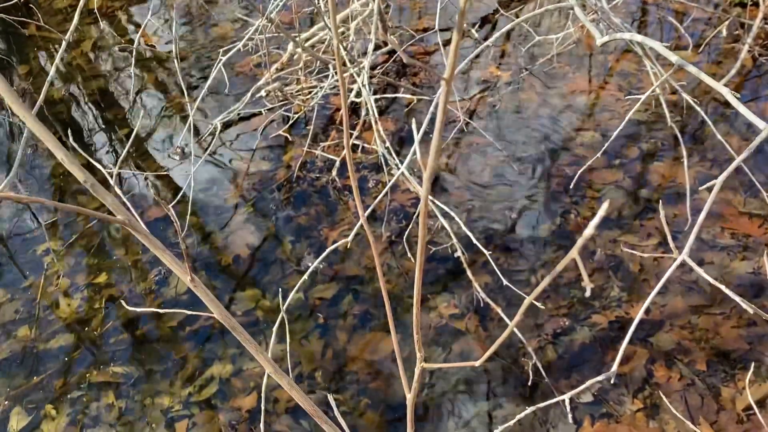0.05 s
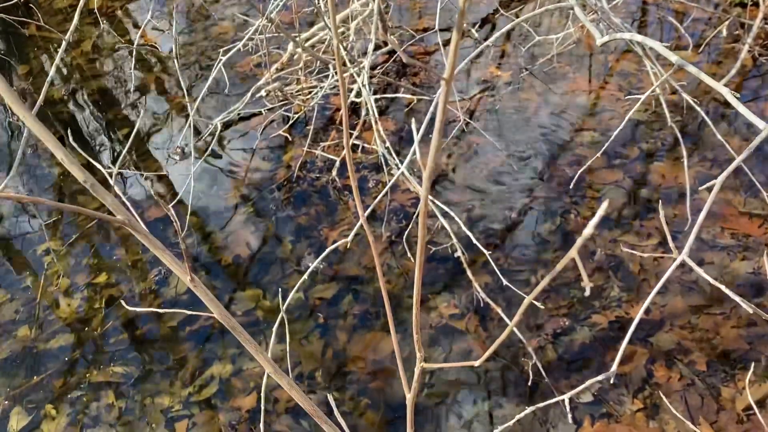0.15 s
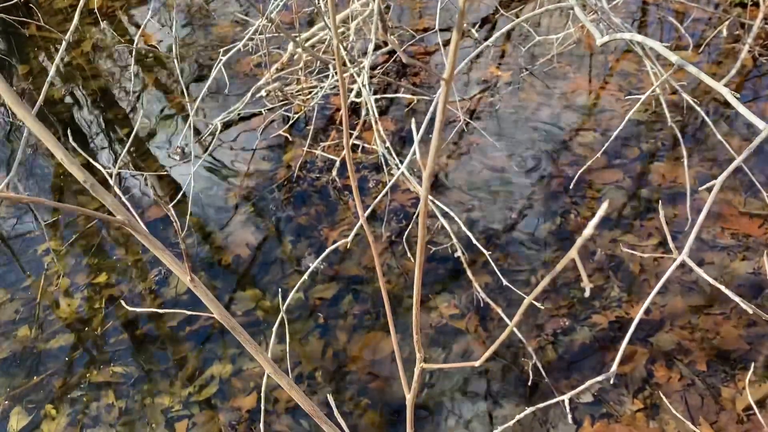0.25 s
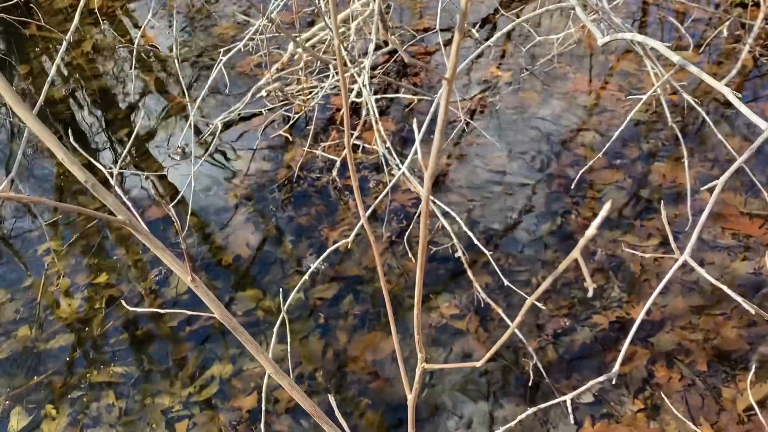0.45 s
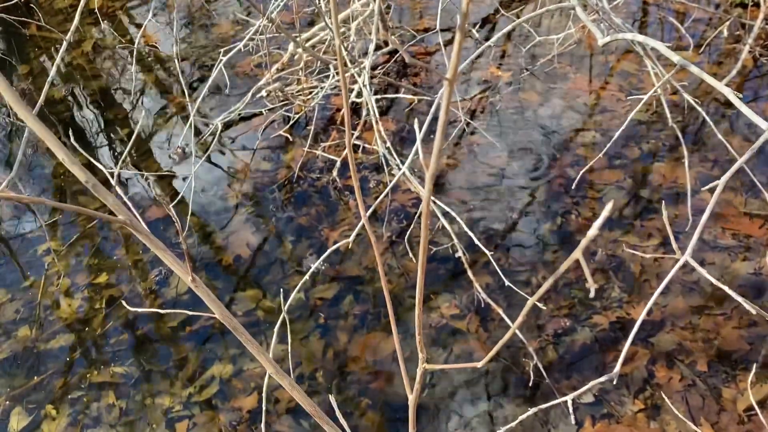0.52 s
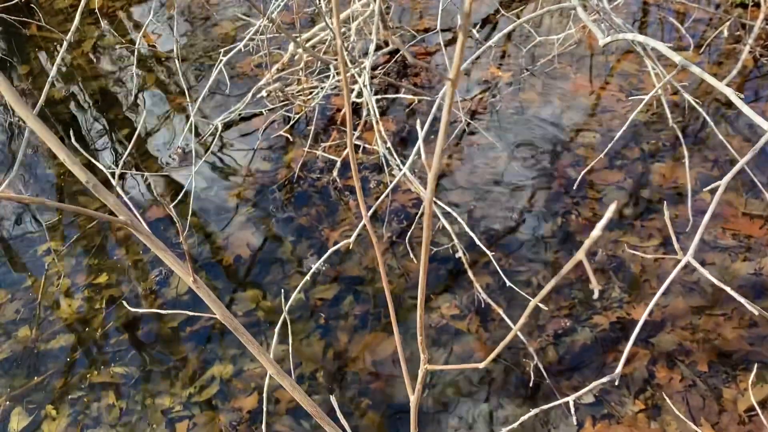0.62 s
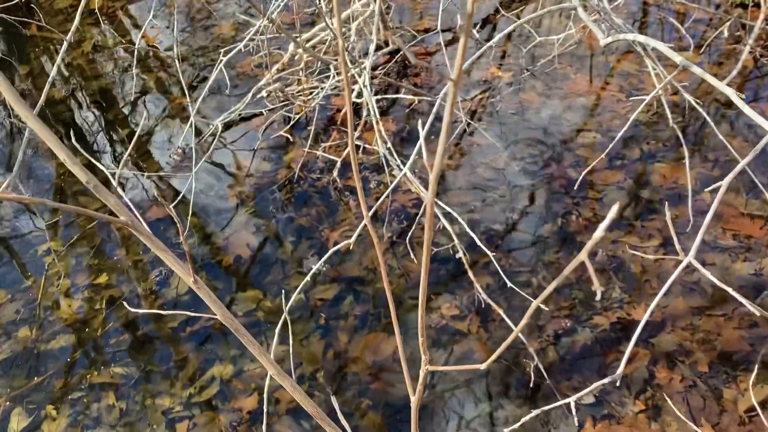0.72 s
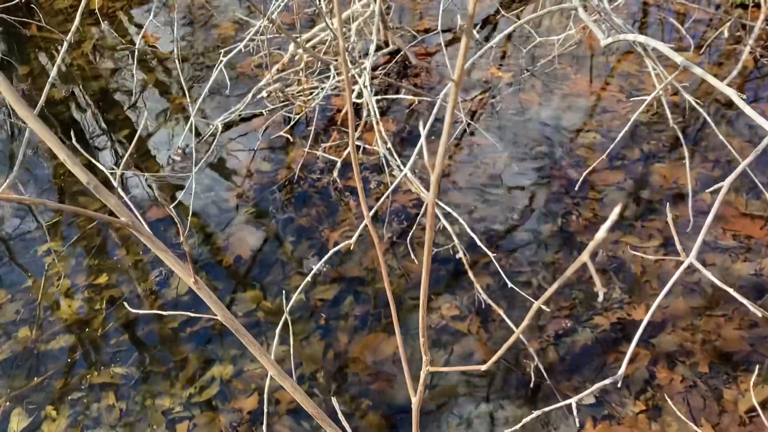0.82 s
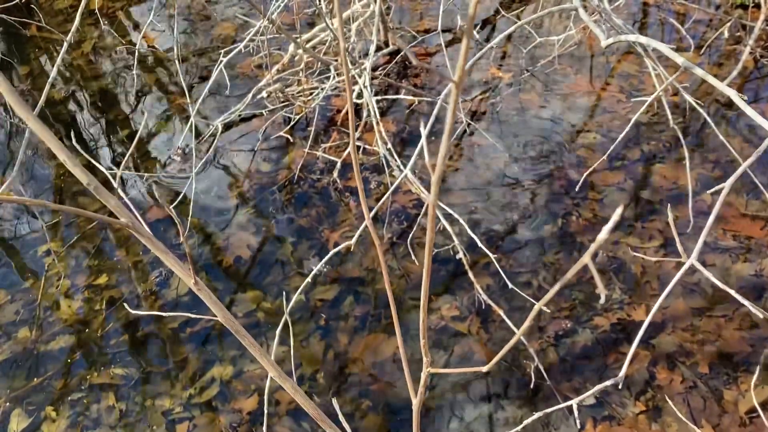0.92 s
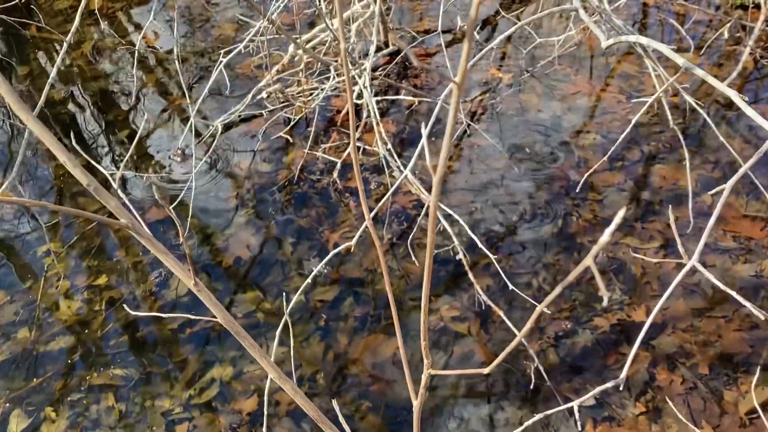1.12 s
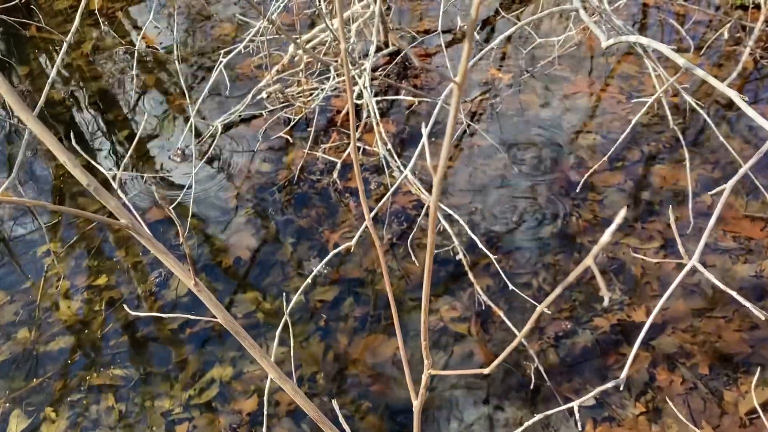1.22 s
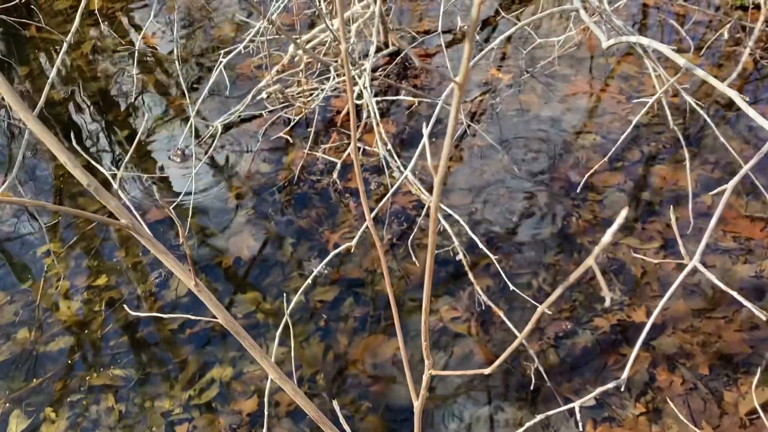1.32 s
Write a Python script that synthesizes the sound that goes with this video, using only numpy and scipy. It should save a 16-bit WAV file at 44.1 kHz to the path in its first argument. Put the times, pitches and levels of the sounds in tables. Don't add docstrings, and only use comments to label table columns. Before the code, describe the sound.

Overlapping short raspy frog croaks from a woodland pool, thickest mid-way, over very quiet low background

```python
import sys
import numpy as np
from scipy import signal
from scipy.fft import rfft, irfft, next_fast_len
from scipy.io import wavfile
from scipy.ndimage import map_coordinates

SR = 44100
rng = np.random.default_rng(int(sys.argv[2]) if len(sys.argv) > 2 else 0)


def materialize(psi):
    bounded = np.clip(np.atleast_2d(psi).T, -1, 1)
    quanta = np.round(bounded * 32767).astype(np.int16)
    wavfile.write(sys.argv[1], SR, quanta)


def to_linear_factor(level_db):
    exponent = np.asarray(level_db, float) / 20
    return 10 ** exponent


N = 59535


def along(points, hz):
    f, v = np.transpose(points)
    return np.interp(np.log(hz + 1), np.log(f + 1), v)


def unit(x):
    return x / np.sqrt(np.mean(x ** 2) + 1e-20)


def filtered(x, response):
    m = next_fast_len(x.shape[-1] + 8192)
    spectrum = rfft(x, m) * response(np.fft.rfftfreq(m, 1 / SR))
    return irfft(spectrum, m)[..., :x.shape[-1]]


def wobble(rate):
    knots = rng.standard_normal(int(N * 60 / SR) + 4)
    return map_coordinates(knots, [np.arange(N) * rate / SR], mode="nearest")


def noise(spectrum, alike):
    a, b = filtered(rng.standard_normal((2, N)), lambda hz: to_linear_factor(along(spectrum, hz)))
    angle = np.arccos(np.clip(alike, -1, 1)) / 2
    mid, side = np.cos(angle) * a, np.sin(angle) * b
    return unit(np.array([mid + side, mid - side]))


# pitch_hz, level_db (per Hz)
CHORUS_COLOUR = [(200, -41.5), (364, -25), (700, 1.5), (1600, -0.5), (2600, -11), (4000, -23.5),
                 (6000, -36), (12000, -44)]
# time_s, level_db
CHORUS_LEVEL = [
    (0, -58),
    (.16, -57),
    (.3, -54),
    (.8, -53),
    (.95, -55),
    (1.04, -54),
    (1.35, -53),
]


def distant_chorus():
    time_s, level_db = np.transpose(CHORUS_LEVEL)
    swell_db = np.interp(np.arange(N) / SR, time_s, level_db)
    flutter_db = 1.2 * wobble(25) + 1.2 * wobble(55)
    return to_linear_factor(swell_db + flutter_db) * noise(CHORUS_COLOUR, .4)


# pitch_hz, level_db (per Hz)
RUMBLE_COLOUR = [(20, -35), (32, -18), (44, -2), (75, 1), (125, -10), (161, -18), (298, -28), (420, -50)]


def traffic_rumble():
    return to_linear_factor(-63 + 2.9 * wobble(9)) * noise(RUMBLE_COLOUR, 0.89)


def hum():
    return to_linear_factor(-71 + 2.1 * wobble(5)) * np.sin(2 * np.pi * 117.5 * np.arange(N) / SR)


# last_tick_s, peak_db, gap_ms, swell_db_per_ms, squeak_db
SWELLS = [(.7537, -23, 4.2, .9, -40), (.6258, -31, 3.7, .5, -45), (.9264, -25, 6.9, .6, -35),
          (.8623, -30, 5.9, 2.5, -57), (.3917, -27, 5.2, 1.5, -40), (.4562, -28, 10, 1.3, -48),
          (.328, -28, 6.1, .5, -52), (.5599, -22, 3.8, .55, -55), (.6846, -24, 3.7, .8, -51),
          (.8564, -29, 3.3, .8, -66), (.899, -30, 3.9, .4, -66), (.1825, -29, 4.8, .4, -66),
          (.153, -39, 6, .6, -66), (.127, -46, 4, .5, -62)]
SWELL_CALLER = [0, 9, 1, 1, 3, 4, 5, 6, 6, 6, 6, 8, 8, 3]

PULSE = np.arange(14)


def swells_of(caller):
    return [row for row, who in zip(SWELLS, SWELL_CALLER) if who == caller]


def swelling_ticks(caller):
    longest_ms, squeak_swell = 28, .55
    rows = [np.zeros((0, 4))]
    for last_s, peak_db, gap, swell, squeak_db in swells_of(caller):
        ms = gap * PULSE[gap * PULSE < longest_ms]
        rows.append(np.c_[last_s - ms / 1000, peak_db - swell * ms, squeak_db - squeak_swell * ms, 0 * ms])
    return np.vstack(rows)


# start_s, peak_db, gap_ms, hold_ms, fade_db_per_ms
CROAKS = [(.7585, -14.5, 2.5, 7.5, 1.5), (.632, -17, 2.35, 13.3, 1.3), (.933, -15.5, 2.4, 7, 1.3),
          (.9524, -26, 3, 3, 3), (.7804, -15.5, 2.35, 9.4, 1.03), (.9603, -20, 3, 10.4, 1.14),
          (.3973, -23, 2.37, 14, 1), (.4671, -19.5, 2.6, 19, 1), (.2325, -25.5, 2.6, 1.9, 1.1),
          (.2496, -22.5, 2.8, 6, .9), (.2644, -30.5, 2.3, 18.4, 1.5), (.6898, -24, 4.2, 1, .4),
          (.3123, -36, 3, 8, 2.6), (1.2925, -32, 2.34, 6.8, 1), (1.034, -44, 3.4, 19, 0.16),
          (1.109, -42, 3.3, 24, 2), (1.341, -40.5, 3.6, 9, 1.1), (.726, -37, 3.7, 9.6, 1.5),
          (1.2623, -29, 3.2, 14, 1), (.117, -41.5, 3, 12, 0), (1.2513, -39, 3.6, 8, 5),
          (1.08, -43.5, 5.4, 10, 2), (.2, -40.5, 4, 8, .5), (1.181, -40, 2.7, 12, 1),
          (.5637, -24.5, 5.3, 5.5, 4), (.2423, -25, 3.2, 3.3, 6)]
CROAK_CALLER = [0, 9, 1, 1, 2, 1, 3, 4, 5, 5, 10, 6, 3, 7, 7, 7, 7, 10, 8, 8, 8, 8, 8, 8, 6, 5]
FIRST_GAP_MS = [3.8, 4.8, 3.9, 3, 3.6, 4, 3.4, 5.5, 2.6, 2.8, 2.3, 3.9, 2.5, 2.3, 4, 4, 4, 2.5, 4.1, 4, 4,
                6, 5, 3.5, 5.3, 3.2]


def croak_bursts(caller):
    carry = .4
    squeak_fade, squeak_under_db = .75, -29
    rows = [np.zeros((0, 4))]
    for (start, peak_db, gap, hold, fade), who, first in zip(CROAKS, CROAK_CALLER, FIRST_GAP_MS):
        if who != caller:
            continue
        ms = gap * PULSE + (first - gap) * (1 - carry ** PULSE) / (1 - carry)
        lead = [swell[4] for swell in swells_of(caller) if 0 < start - swell[0] < .015]
        squeak_db = lead[0] if lead else peak_db + squeak_under_db
        sac_db = peak_db - abs(fade) * np.maximum(ms - hold, 0)
        rows.append(np.c_[start + ms / 1000, sac_db, squeak_db - squeak_fade * ms, ms / 1000])
    return np.vstack(rows)


# times_sac_pitch, level_db, t60_s
SIDE_MODES = [
    (.72, -9.5, .0063),
    (1.17, -10, .0068),
    (1.4, -22, .006),
]


def frog(rows, sac_hz, squeak_hz, sac_t60, rasp, air, deep_db, upper_hz, upper_db, rasp_db, over_db):
    jitter_s, scatter_db, detune = .0001, 1.2, .012
    strike_s, snap_s = .00033, .0002
    low_t60, squeak_t60, rasp_t60, air_t60 = .013, .01, .016, .013
    s, db, squeak_db, age = rows.T[:, :, None]
    z = rng.standard_normal((len(rows), 16, 1))
    s = s + jitter_s * z[:, 0] - strike_s
    at = np.floor(s * SR).astype(int) + 1 + np.arange(900)
    t = at / SR - s

    def ring(hz, level_db, t60, j):
        level = to_linear_factor(level_db + scatter_db * z[:, j] - 60 * t / t60)
        return level * np.sin(2 * np.pi * hz * (1 + detune * z[:, j + 7]) * t)

    sag = 1 - 2.83 * age
    low_db = db - 11 + 300 * np.minimum(age, .017)
    body = ring(sac_hz * sag, db, sac_t60, 1) - ring(830, low_db, low_t60, 2)
    body = body + ring(620, db + deep_db, low_t60, 0)
    body = body + ring(upper_hz * sag, db + upper_db, sac_t60, 7)
    for j, (ratio, level_db, t60) in enumerate(SIDE_MODES):
        body = body + ring(ratio * sac_hz * sag, db + level_db, t60, 4 + j)
    squeak = ring(squeak_hz, squeak_db, squeak_t60, 3)
    squeak = squeak + ring(10800, squeak_db - 19 + over_db, squeak_t60, 8)

    at = np.clip(at, 0, N)
    body = body + to_linear_factor(db - 20.5 + rasp_db - 60 * t / rasp_t60) * rasp[at % N]
    squeak = squeak + to_linear_factor(squeak_db - 10.5 - 60 * t / air_t60) * air[at % N]
    x = body * (1 - np.exp(-(t / strike_s) ** 2)) + squeak * (1 - np.exp(-(t / snap_s) ** 2))
    return np.bincount(at.ravel(), x.ravel(), N + 1)[:N]


# pitch_hz, t60_s
TREE_DECAY = [(500, 0.067), (2000, .11), (8000, 0.069)]


def trees(x):
    hz, t, z = signal.stft(rng.standard_normal((2, SR // 4)), SR, nperseg=128)
    tail = signal.istft(z * to_linear_factor(-60 * t / along(TREE_DECAY, hz)[:, None]), SR, nperseg=128)[1]
    late = np.pad(x, (60, 0))[None]
    return signal.fftconvolve(late, tail / np.linalg.norm(tail[0]), axes=1)[:, :N]


# sac_hz, squeak_hz, sac_t60_s, left_lag_ms, echo_db
CALLERS = [(1880, 5500, .0115, .03, -10), (1570, 7100, .009, .05, -11), (1900, 5300, .0105, -.08, -10),
           (1720, 4970, .011, -.15, -10), (1850, 5270, .011, -.15, -10), (1470, 5200, .011, -.12, -9),
           (1680, 5050, .01, -.12, -11), (1710, 5600, .018, -.39, -7), (1350, 5600, .009, -.31, -7),
           (1830, 5400, .0115, .03, -10), (1980, 5000, .009, -.12, -9)]
# deep_tone_db, upper_mode_hz, upper_db, rasp_db, overtone_db
VOICES = [(-25, 2500, -22, -3, -14), (-30, 2870, -24, 0, 8), (-18, 2450, -22, -3, -14),
          (-20, 2430, -12, 9, -14), (-20, 3250, -18, 5, -8), (-8, 3350, -20, 6, -8),
          (-12, 3150, -11, 3, -6), (-25, 2600, -15, 3, 0), (-12, 3300, -20, 5, 0), (-30, 2900, -20, -4, 12),
          (-2, 3450, -14, 8, -6)]
# pitch_hz, level_db (per Hz)
RASP_COLOUR = [(400, -31), (800, -8.5), (1700, -1.5), (3000, -19), (4200, -26), (5500, -27), (8800, -61.5),
               (11000, -53)]
# pitch_hz, level_db (per Hz)
AIR_COLOUR = [(2500, -10), (3600, 0), (5500, 0), (6300, -20), (9000, -40), (10500, -26), (12500, -28),
              (15000, -38)]


def pool():
    out = np.zeros((2, N))
    side = np.array([[.5], [-.5]])
    for caller, (sac_hz, squeak_hz, sac_t60, lag, echo_db) in enumerate(CALLERS):
        rows = np.vstack([swelling_ticks(caller), croak_bursts(caller)])
        rasp, air = noise(RASP_COLOUR, 0.92)[0], noise(AIR_COLOUR, 0.95)[0]
        x = frog(rows, sac_hz, squeak_hz, sac_t60, rasp, air, *VOICES[caller])
        out += filtered(x, lambda hz: to_linear_factor(1 * side) * np.exp(-2j * np.pi * hz * lag / 1000 * side))
        out += to_linear_factor(echo_db) * trees(x)

    def high_pass(hz):
        s = 1j * hz / 612
        return (s ** 2 / (1 + 1.4 * s + s ** 2)) ** 2

    return filtered(out, high_pass)


def scene():
    near_frogs = to_linear_factor(3) * pool()
    background = distant_chorus() + traffic_rumble() + hum()
    return near_frogs + background


def band_limit(x):
    return signal.sosfilt(signal.butter(12, 15700, fs=SR, output="sos"), x)


# pitch_hz, level_db
MIC = [(5800, 0), (6500, -3), (7800, 0), (8400, -25), (9500, -25), (10000, -3), (12500, -3), (13200, -22)]


def record(dry):
    mix = filtered(dry, lambda hz: to_linear_factor(along(MIC, hz)))
    return band_limit(mix)


dry = scene()
out = record(dry)
materialize(out)
```